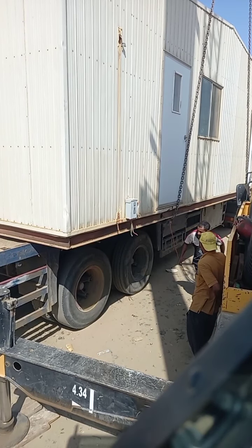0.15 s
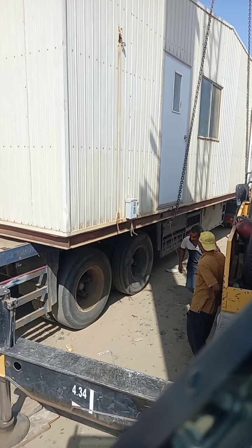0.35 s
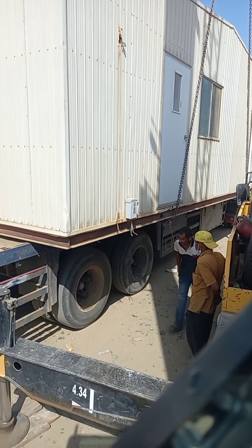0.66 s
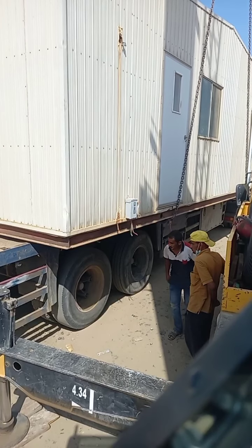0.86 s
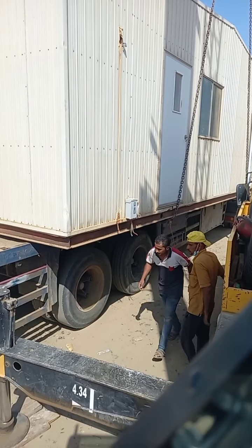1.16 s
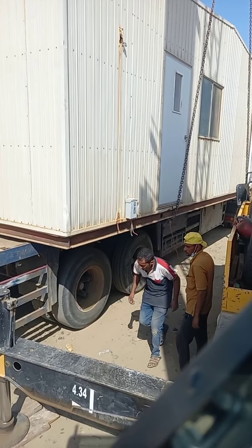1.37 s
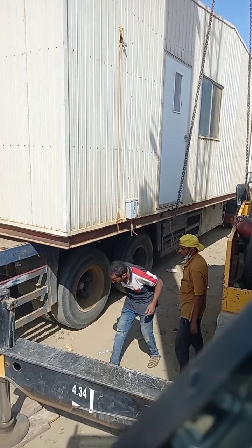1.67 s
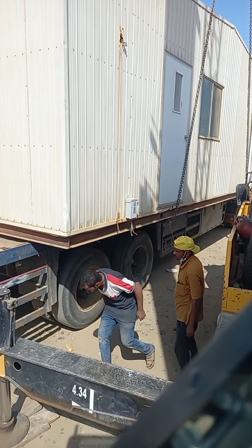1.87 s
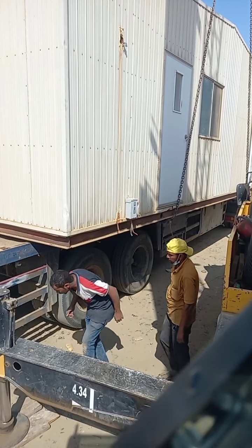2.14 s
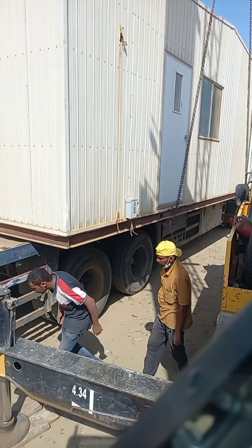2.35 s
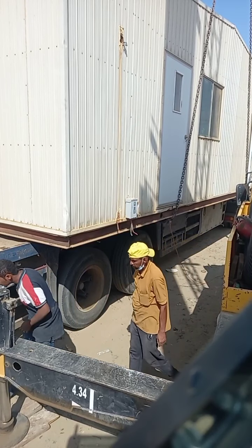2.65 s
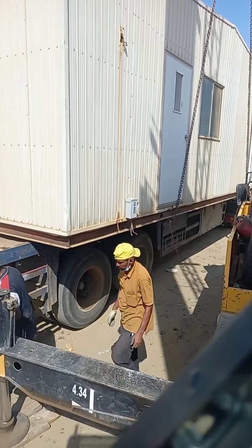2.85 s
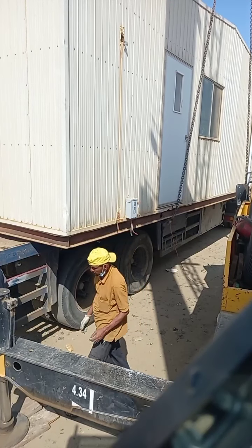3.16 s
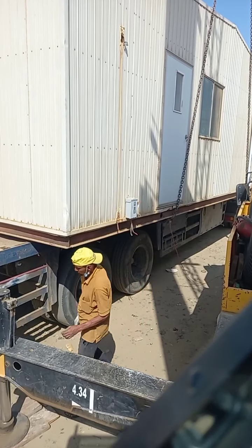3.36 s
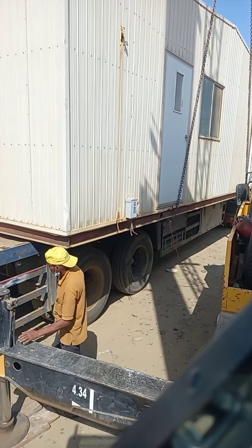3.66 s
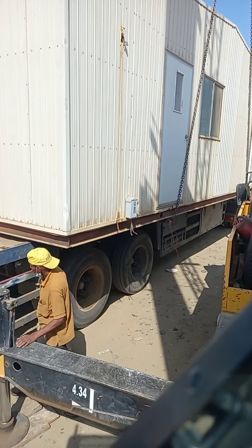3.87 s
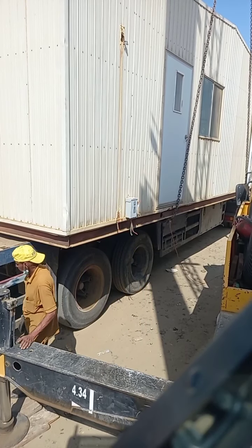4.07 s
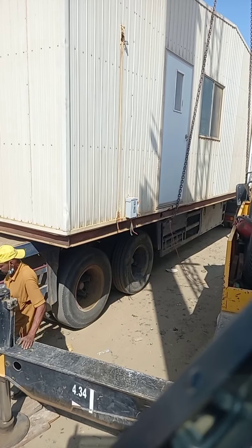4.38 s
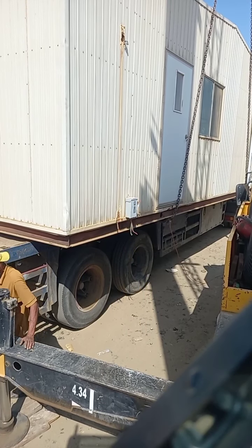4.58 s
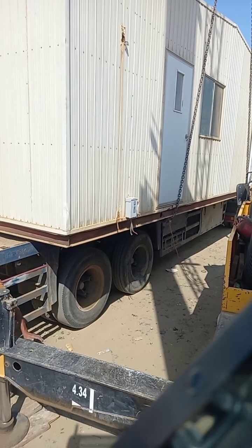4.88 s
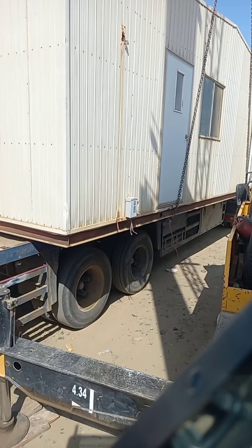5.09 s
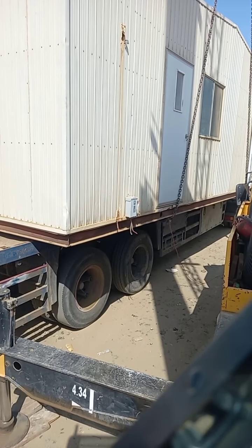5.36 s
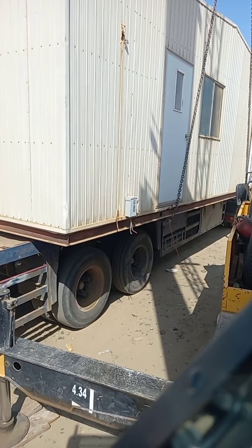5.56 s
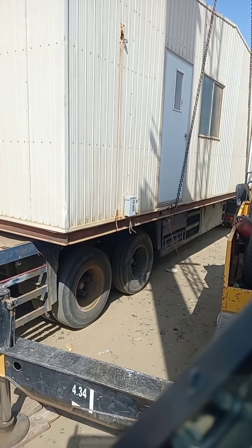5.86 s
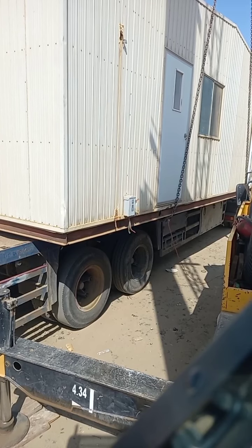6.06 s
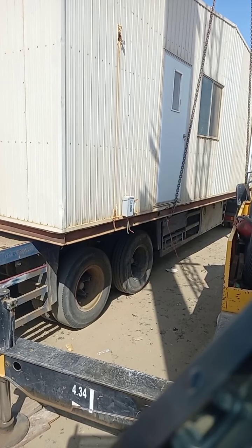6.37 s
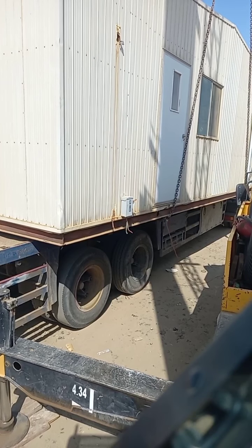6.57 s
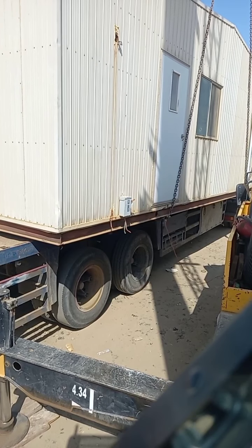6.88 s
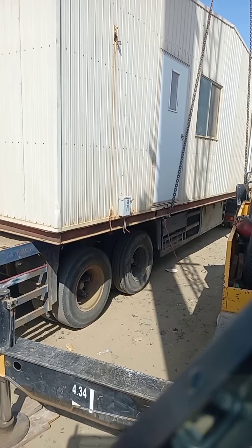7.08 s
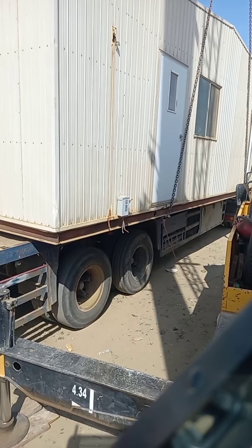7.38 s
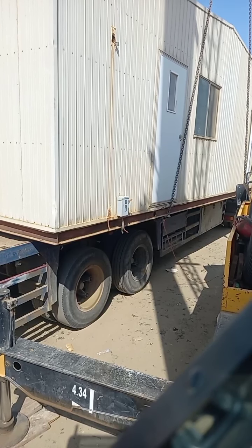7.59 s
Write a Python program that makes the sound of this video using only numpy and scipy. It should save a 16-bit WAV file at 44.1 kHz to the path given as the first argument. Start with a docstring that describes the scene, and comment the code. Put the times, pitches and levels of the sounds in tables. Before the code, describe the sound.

Steady heavy engine roar with a low droning pump whine, irregular metal bangs rattling in plates, then the pump runs up slightly near the end.

```python
"""A knock of steel on steel opens the scene, in a crane's cab over the rumble, roar and hiss of its idling diesel.
Engine and oil are coloured noise throbbing with the hydraulic pump, whose whine is a stack of wavering sines.
At about six seconds the pump is unloaded: it runs up, while whine and hiss drop and creep back.
Knocks in the frame, often bouncing, are short cracks with noise rattling on in the plates; low sines boom the cab.
Late on a faint squeal sets in; microphone and recorder colour, level and round off the whole."""
import sys
import numpy as np
from scipy import signal
from scipy.fft import rfft, irfft, next_fast_len
from scipy.io import wavfile

SR = 44100
rng = np.random.default_rng(int(sys.argv[2]) if len(sys.argv) > 2 else 0)


def dump_mix(stems):
    """Bounce the given channels to the path in sys.argv[1] as a 16-bit WAV at rate SR."""
    frames = np.atleast_2d(stems).T  # one column per channel
    limited = np.clip(frames, -1, 1)  # hard clip at full scale
    pcm = np.round(limited * 32767).astype(np.int16)
    wavfile.write(sys.argv[1], SR, pcm)


N = 340893

# Engine roar. Each row: frequency in Hz, relative density in dB per Hz.
ROAR_SPECTRUM = [(40, -2.5), (55, 5), (110, 5.5), (140, -28.5), (220, -16), (320, -20), (600, -16),
                 (1100, -22), (1600, -21), (2500, -27), (3000, -34.5), (4500, -35.5), (6500, -30),
                 (14000, -33)]
# Oil hiss. Each row: frequency in Hz, relative density in dB per Hz.
HISS_SPECTRUM = [(2000, -11), (5000, -3.5), (9000, 2.5), (11500, 1), (12600, -1), (14000, 8)]
# How the panels pass on the pump's multiples. Each row: frequency in Hz, peak level in dB.
WHINE_LEVELS = [(116, -32.5), (232, -38), (347, -34), (470, -35.5), (577, -35), (610, -68), (700, -51),
                (930, -46), (1050, -50)]
# Hum between the pump's multiples. Each row: time in seconds, level in dB.
HUM_LEVELS = [(0, -40), (1.8, -44), (2.4, -42), (6.0, -56.5), (6.2, -40), (7.73, -42)]
# Blows and their bounces. Each row: time in seconds, blow level in dB, cab boom level in dB.
BLOWS = [(0.0, -21, -18.5), (0.4707, -14, -19.5), (0.6105, -14, -15), (0.8616, -13, -15),
         (0.9374, -16, -23), (1.0094, -19.5, -13), (1.0889, -19.5, -35), (1.167, -19.5, -23),
         (1.986, -13.5, -18), (2.0394, -20.5, -30), (2.116, -19, -36), (2.198, -18.5, -16.5),
         (2.279, -19, -23), (2.362, -19, -15), (2.864, -13.5, -19), (3.0003, -15, -13), (3.0794, -18, -22),
         (3.163, -20, -17.5), (3.897, -12.5, -16), (4.0356, -14, -14.5), (4.577, -10.5, -15.5),
         (4.8334, -11, -20), (4.916, -15, -11.5), (4.9894, -18.5, -23), (5.0789, -20, -16),
         (6.047, -12, -14), (6.9052, -11, -16)]
# Rattle of the struck plates. Each row: frequency in Hz, relative density in dB per Hz.
RATTLE_SPECTRUM = [(110, 13), (220, 0), (450, 0.5), (700, -3.5), (1100, -9), (1600, -1.5), (2400, -5.5),
                   (3300, -11), (4200, -8), (6500, -21), (9000, -14)]
# How that rattle dies. Each row: frequency in Hz, time to fall by 60 dB in seconds.
RATTLE_DECAY = [(200, 0.63), (700, 0.39), (1800, 0.48), (4800, 0.26), (9000, 0.21)]
# Ringing plates. Each row: frequency in Hz, width in Hz, relative level in dB.
PLATE_MODES = [(205, 20, -5), (226, 14, -3), (385, 30, -9), (525, 30, -9), (615, 30, -9), (660, 30, -8),
               (698, 16, -6), (860, 40, -11), (1040, 50, -10), (1400, 70, -11), (1614, 28, -3.5),
               (1698, 16, -9), (2030, 25, -6), (2400, 80, -11), (2497, 22, -10), (3150, 60, -14),
               (3880, 120, -14), (4230, 45, -10), (5120, 120, -16), (6300, 150, -16)]
# Hollow of the cab. Each row: frequency in Hz, width in Hz, relative level in dB.
CAB_MODES = [(58, 9, -5), (81, 6, 0), (95, 8, -3), (104, 8, -5)]
# The cab's walls after a blow. Each row: frequency in Hz, relative level in dB.
WALL_TONES = [(81, 0), (93, -10), (103, -6)]
# Treble of the microphone. Each row: frequency in Hz, gain in dB.
MICROPHONE_RESPONSE = [(6600, 1), (7100, -7), (7300, -26), (7600, -13), (9200, -12.5), (9900, -7),
                       (11500, -7), (12600, -0.5), (14000, -7)]

# The pump sags slowly under load, then is unloaded and runs up to its free speed (pulses per second).
LOADED_PER_S, SAG_PER_S2, FREE_PER_S, UNLOAD_S, RUN_UP_S = 116.5, .26, 122.2, 6.06, .16
# On unloading, hiss and whine drop and creep back; under load both fade a little.
HISS_DROP_DB, HISS_BACK_S, WHINE_DROP_DB, WHINE_BACK_S = 12, 2.7, 7, 0.83
HISS_FADE_DB_PER_S, WHINE_FADE_DB_PER_S, DROP_S = 0.02, .5, .05
# The roar dips on unloading, then grows.
ROAR_DB, ROAR_DROP_DB, ROAR_RISE_DB_PER_S = -27, 1, 2
HISS_DB, PANEL_BUZZ_DB = -34.5, -51
HUM_LOADED, HUM_FREE = 2.5, 2.3   # hum pitch as a multiple of the pump's pulse rate
LEAD_S = 0.0054   # each knock's envelope starts this much before its listed time
RATTLE_DB, PLATE_DB = -10, -6   # whole rattle; plate resonances within it
HARD_BLOW_DB, DEEP_DB, DEEP_PER_DB = -10.5, 1.8, 0.22   # softer blows clang deeper
TREBLE_DB, CRACK_DB = -20, 7.5   # treble below the blow level; its sharp onset above that
CAB_IDLE_DB, BOOM_LAG_S, BOOM_RISE_S, BOOM_T60_S = -28.5, 0.0084, 0.017, 1.0
SQUEAL_HZ, SQUEAL_WIDTH_HZ, SQUEAL_DB = 2045, 10, -44.5
SQUEAL_S, SQUEAL_ATTACK_S = 7.31, .04   # it sets in and stays
LOW_CUT_HZ, CUTOFF_HZ = 44, 13950
# The recorder slowly turns down a share of what is louder than this.
GAIN_SHARE, GAIN_FROM_DB, GAIN_S = 0.18, -21, 0.3


def engine(pulses, roar_db, hiss_db):
    """Noise of exhaust and oil throbs with the pump's pulses; the shaken plates sing along faintly."""
    throb = 1 + .12 * np.cos(2 * np.pi * pulses)
    roar = rms_one(colour(throb * noise(), ROAR_SPECTRUM))
    hiss = rms_one(colour(throb * noise(), HISS_SPECTRUM))
    roar_gain = from_db(roar_db + 1.16 * drift(8.1))
    hiss_gain = from_db(HISS_DB + hiss_db + .5 * drift(7.6))
    buzz = from_db(PANEL_BUZZ_DB) * resonances(noise(), PLATE_MODES)
    return roar_gain * roar + hiss_gain * hiss + buzz


def pump(per_s, pulses, whine_db):
    """Each multiple of the pulse rate is a sine of wavering level, passed on by the panels."""
    tones = 0
    for multiple in range(1, 10):
        level_db = at_hz(WHINE_LEVELS, multiple * per_s) + 1.6 * drift(8.5)
        tones = tones + from_db(level_db) * np.sin(2 * np.pi * (multiple * pulses + rng.random()))
    return from_db(whine_db) * tones


def gear_hum(per_s, free_s):
    """One tone tied to the pump's speed, by another ratio once it runs free."""
    hz = per_s * np.where(free_s > 0, HUM_FREE, HUM_LOADED)
    times, levels = np.transpose(HUM_LEVELS)
    level_db = np.interp(np.arange(N) / SR, times, levels) + 1.9 * drift(2)
    return np.sqrt(2) * from_db(level_db) * np.sin(2 * np.pi * np.cumsum(hz) / SR)


def since_unloading():
    """Seconds under load so far, and seconds of free running."""
    s = np.arange(N) / SR
    return np.minimum(s, UNLOAD_S), np.maximum(s - UNLOAD_S, 0)


def drop(free_s, depth_db, back_s):
    """A quick fall on unloading that heals slowly, in dB."""
    return -depth_db * (1 - np.exp(-free_s / DROP_S)) * np.exp(-free_s / back_s)


def knocks():
    """A short crack of treble, then the plates rattle on, in general the treble dying first."""
    blow_db = np.array(BLOWS)[:, 1]
    chatter = from_db(0.99 * drift(69))      # loose parts strike unevenly
    return chatter * (plate_rattle(blow_db) + crack(blow_db))


def plate_rattle(blow_db):
    """Noise in the plates' resonances, each octave rising and dying at its own pace."""
    deep_db = DEEP_DB + DEEP_PER_DB * (HARD_BLOW_DB - blow_db)
    rattle = rms_one(colour(noise(), [(60, -50)] + RATTLE_SPECTRUM + [(14000, -63)]))
    for plate in PLATE_MODES:      # drifting levels: the blows find the plates differently
        rattle = rattle + from_db(PLATE_DB + 1.26 * drift(13.0)) * resonances(noise(), [plate])
    spectrum = rfft(rattle)
    octave = np.log2(np.fft.rfftfreq(N, 1 / SR) + 1)
    out = 0
    for hz in 100 * 2 ** np.arange(0, 8):      # overlapping octaves, adding up to the whole between centres
        band = irfft(spectrum * np.clip(1 - abs(octave - np.log2(hz)), 0, 1), N)
        level_db = blow_db + RATTLE_DB + deep_db * (hz < 900)
        out = out + band * dying(level_db, 0.01 + 2.0 / hz, at_hz(RATTLE_DECAY, hz))
    return out


def crack(blow_db):
    """Bright noise with a sharp onset and a longer, softer tail."""
    bright = signal.sosfilt(signal.butter(2, 5000, "high", fs=SR, output="sos"), noise())
    treble_db = blow_db + TREBLE_DB
    return bright * (dying(treble_db + CRACK_DB, 0.0012, 0.15) + dying(treble_db, 0.0026, 0.6))


def dying(levels_db, rise_s, t60, lag_s=0):
    """Envelope after the blows: energies add up, rise and die away."""
    start_s = np.maximum(np.array(BLOWS)[:, 0] - LEAD_S + lag_s, 0)
    energy = np.full(N, 1e-18)
    energy[(start_s * SR).astype(int)] = from_db(levels_db) ** 2
    fall, rise = from_db(-120 / (t60 * SR)), np.exp(-1 / (rise_s * SR))
    falling = signal.lfilter([1], [1, -fall], energy)
    return np.sqrt(signal.lfilter([1 - rise], [1, -rise], falling))


def cab(roar_db):
    """The hollow cab hums with the engine; its walls boom, beating, a moment after each blow."""
    idle_gain = from_db(CAB_IDLE_DB + roar_db - ROAR_DB)
    idle = idle_gain * rms_one(resonances(noise(), CAB_MODES))
    walls = 0
    for hz, level_db in WALL_TONES:
        gain = from_db(level_db + 1.7 * drift(0.48))
        cycles = np.cumsum(hz + 1.9 * drift(5.95)) / SR + rng.random()
        walls = walls + gain * np.sin(2 * np.pi * cycles)
    boom = dying(np.array(BLOWS)[:, 2], BOOM_RISE_S, BOOM_T60_S, BOOM_LAG_S)
    return idle + rms_one(walls) * boom


def squeal():
    """Friction noise in one narrow resonance."""
    onset = np.clip((np.arange(N) / SR - SQUEAL_S) / SQUEAL_ATTACK_S, 0, 1)
    return from_db(SQUEAL_DB) * onset * resonances(noise(), [(SQUEAL_HZ, SQUEAL_WIDTH_HZ, 0)])


def noise():
    """White noise of rms 1 for the whole scene."""
    return rng.standard_normal(N)


def from_db(db):
    """Gain of a level in dB."""
    return 10 ** (np.asarray(db) / 20)


def rms_one(x):
    """Scaled to rms 1."""
    return x / np.sqrt(np.mean(x ** 2) + 1e-20)


def at_hz(points, hz):
    """A frequency table read on a log-frequency axis."""
    table_hz, values = np.array(points).T
    return np.interp(np.log(hz), np.log(table_hz), values)


def colour(x, spectrum):
    """Filtered by a table of Hz and dB."""
    size = next_fast_len(N + SR)
    gain = from_db(at_hz(spectrum, np.fft.rfftfreq(size, 1 / SR) + 1))
    return irfft(rfft(x, size) * gain, size)[:N]


def drift(rate_hz):
    """Slow random wander of rms 1: noise through a double low-pass, drawn every 40 samples."""
    r = np.exp(-80 * np.pi * rate_hz / SR)
    draws = rng.standard_normal(N // 40 + 2002)
    slow = signal.lfilter([1], [1, -2 * r, r * r], draws)[2000:]      # skip the filter's start
    return np.interp(np.arange(N) / 40, np.arange(len(slow)), rms_one(slow))


def resonances(x, modes):
    """Parallel resonances, each fed so that unit noise comes out at its own level."""
    out = 0
    for hz, width_hz, level_db in modes:
        r = np.exp(-np.pi * width_hz / SR)
        rung = signal.lfilter([1, 0, -1], [1, -2 * r * np.cos(2 * np.pi * hz / SR), r * r], x)
        out = out + from_db(level_db) * np.sqrt((1 - r * r) / 2) * rung
    return out


def gain_control(x):
    """Power followed by a one-pole; a share of the excess level is taken off."""
    keep = np.exp(-1 / (GAIN_S * SR))
    power = signal.lfilter([1 - keep], [1, -keep], x ** 2, zi=[from_db(GAIN_FROM_DB) ** 2])[0]
    excess_db = np.maximum(10 * np.log10(power) - GAIN_FROM_DB, 0)
    return x * from_db(-GAIN_SHARE * excess_db)


def scene():
    """All sources inside the cab, one channel; the pump's load steers the machine's levels."""
    loaded_s, free_s = since_unloading()
    loaded_per_s = LOADED_PER_S - SAG_PER_S2 * loaded_s
    per_s = FREE_PER_S + (loaded_per_s - FREE_PER_S) * np.exp(-free_s / RUN_UP_S)
    pulses = np.cumsum(per_s) / SR
    hiss_db = drop(free_s, HISS_DROP_DB, HISS_BACK_S) - HISS_FADE_DB_PER_S * loaded_s
    whine_db = drop(free_s, WHINE_DROP_DB, WHINE_BACK_S) - WHINE_FADE_DB_PER_S * loaded_s
    roar_db = ROAR_DB - ROAR_DROP_DB * (free_s > 0) + ROAR_RISE_DB_PER_S * free_s
    machine = engine(pulses, roar_db, hiss_db) + pump(per_s, pulses, whine_db) + gear_hum(per_s, free_s)
    return (machine + knocks() + cab(roar_db) + squeal())[None]


def record(dry):
    """Microphone colour, bass cut, gain control, rounded peaks, top cut."""
    bass_cut = signal.butter(4, LOW_CUT_HZ, "high", fs=SR, output="sos")
    top_cut = signal.ellip(14, .5, 80, CUTOFF_HZ, fs=SR, output="sos")
    heard = signal.sosfilt(bass_cut, colour(dry[0], MICROPHONE_RESPONSE))
    rounded = 0.81 * np.tanh(gain_control(heard) / .8)
    return signal.sosfilt(top_cut, rounded)[None]


dry = scene()
out = record(dry)
dump_mix(out)
```